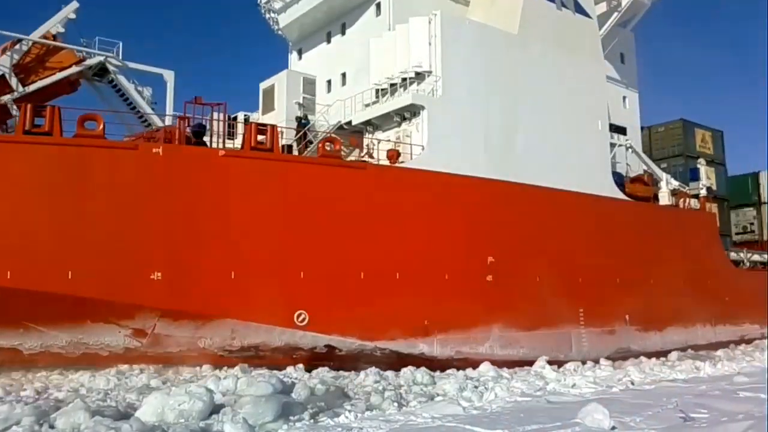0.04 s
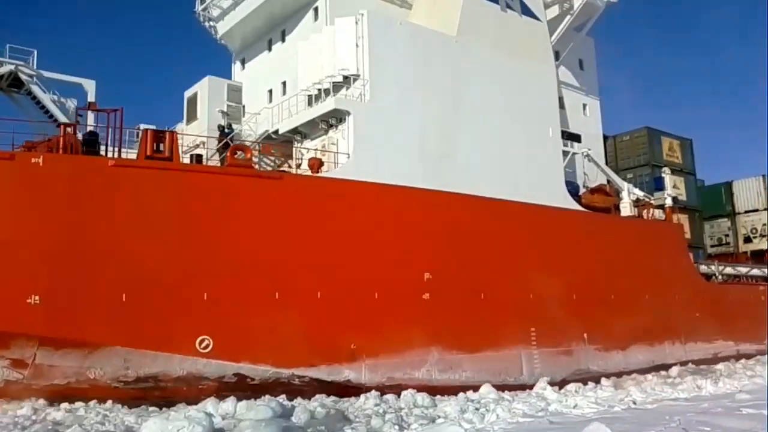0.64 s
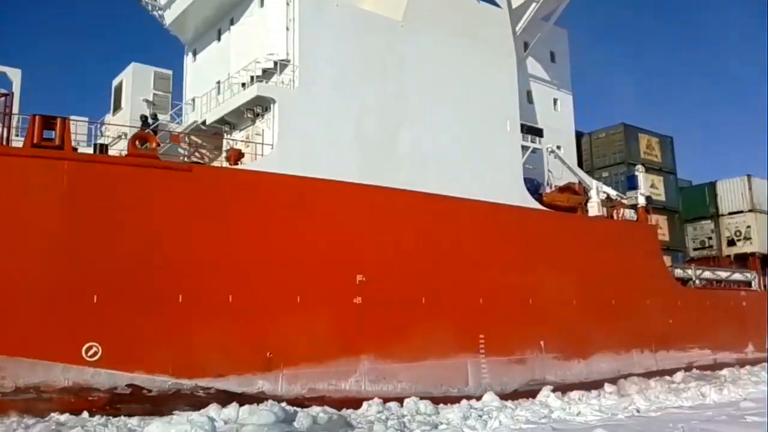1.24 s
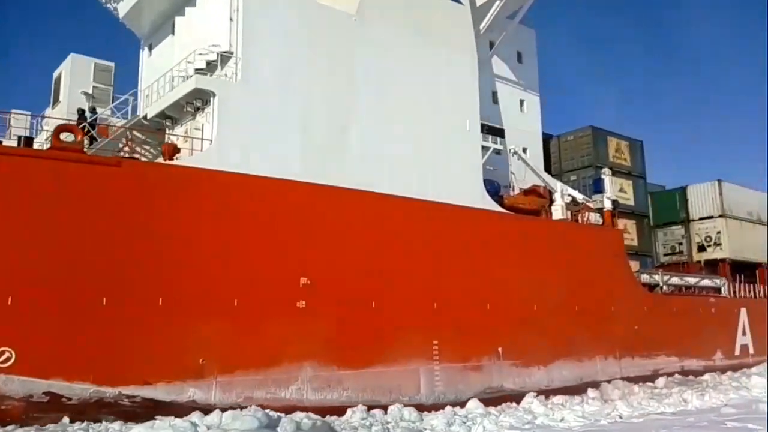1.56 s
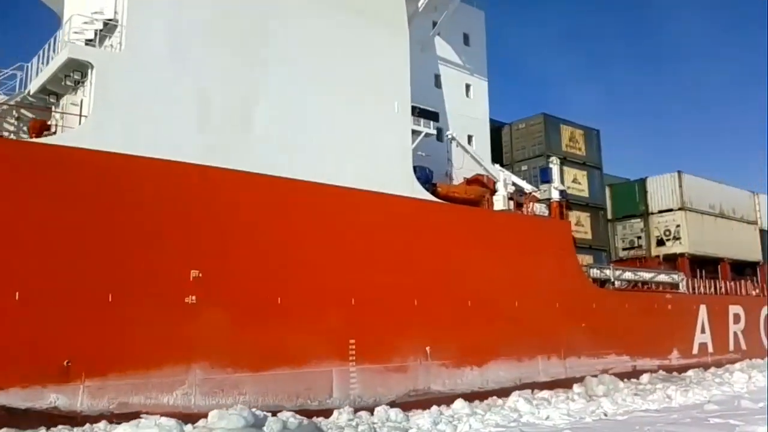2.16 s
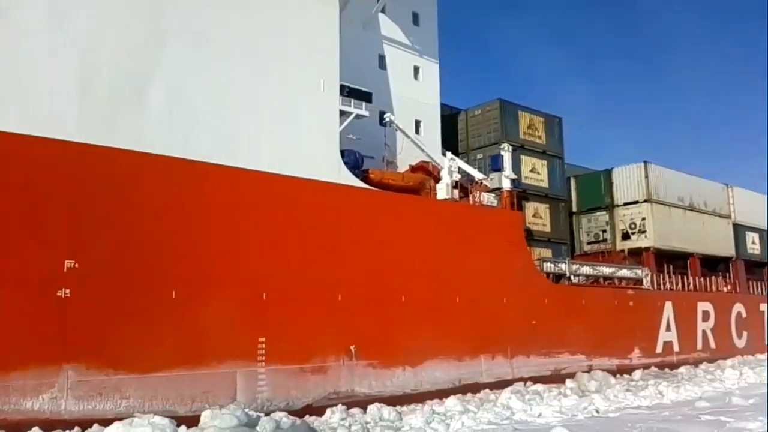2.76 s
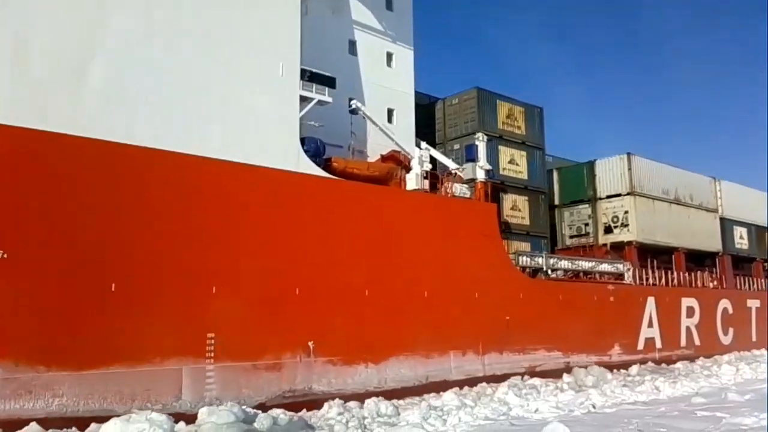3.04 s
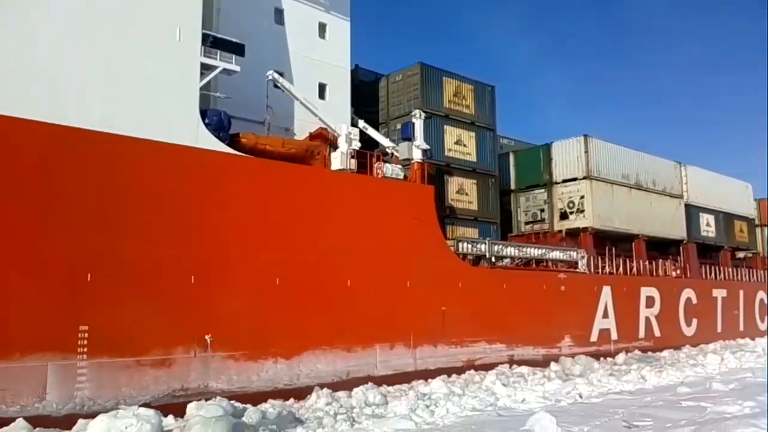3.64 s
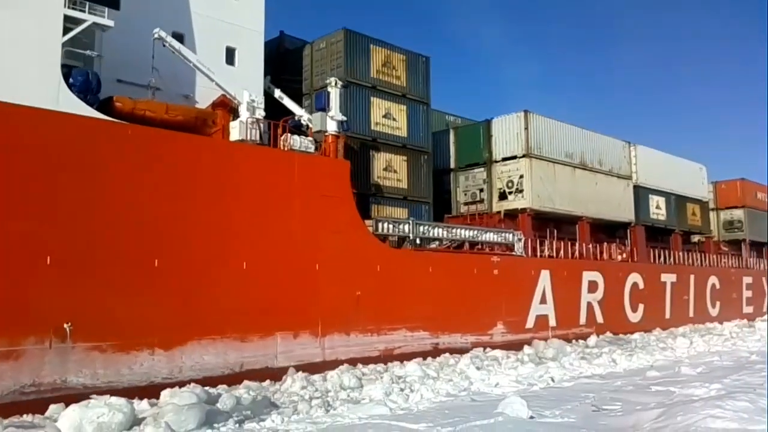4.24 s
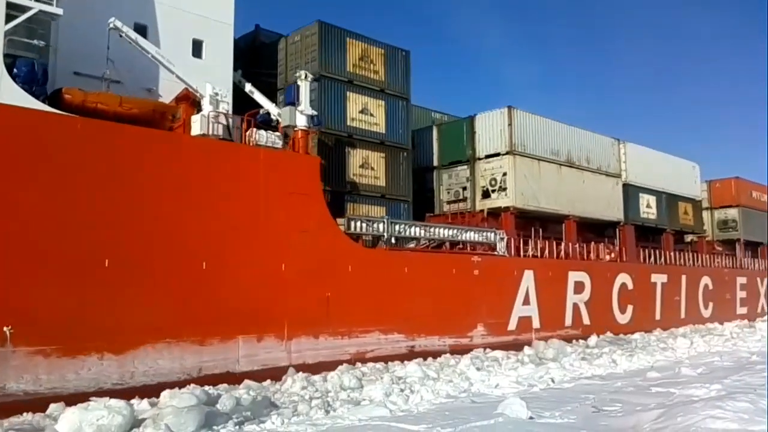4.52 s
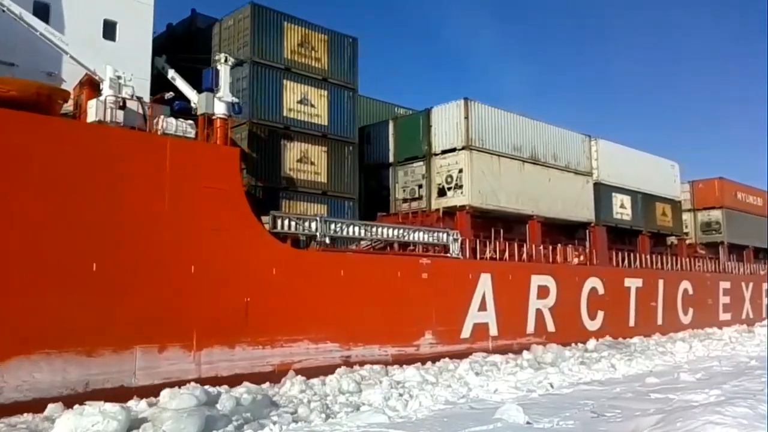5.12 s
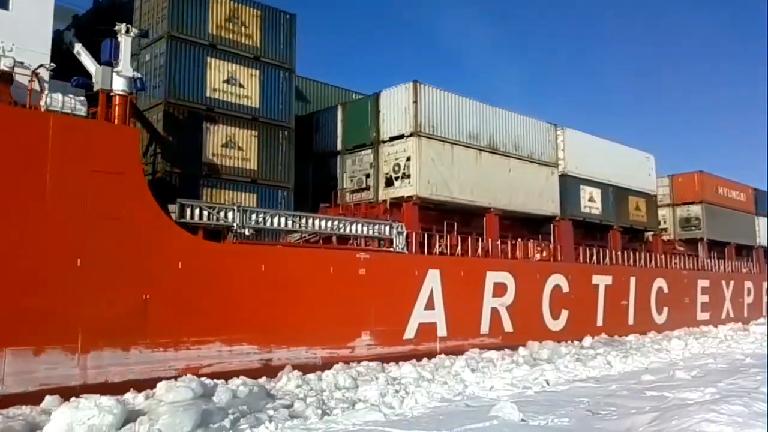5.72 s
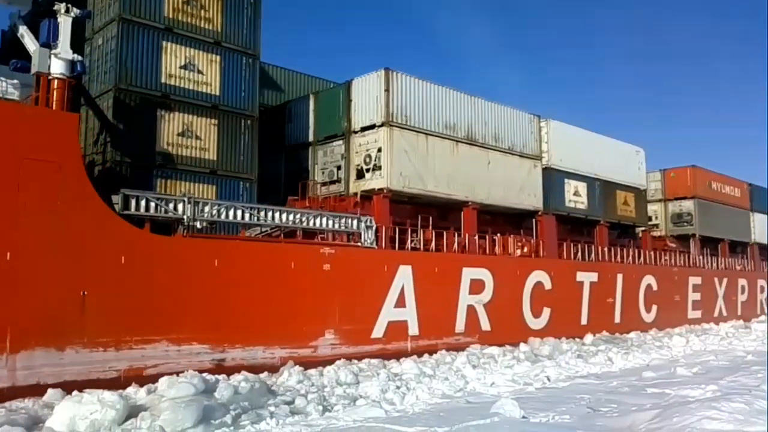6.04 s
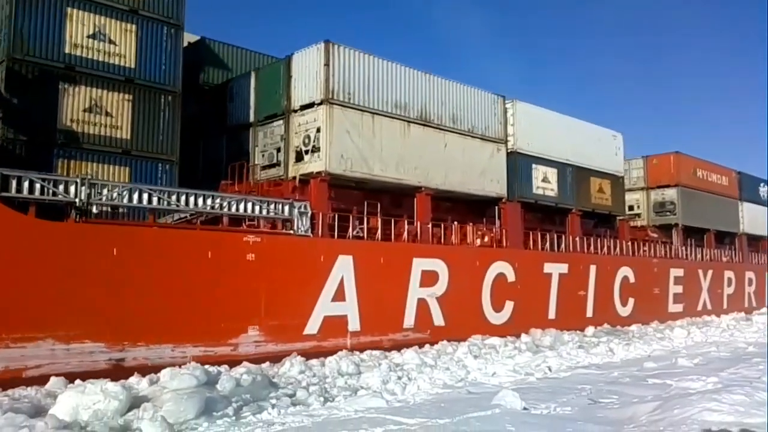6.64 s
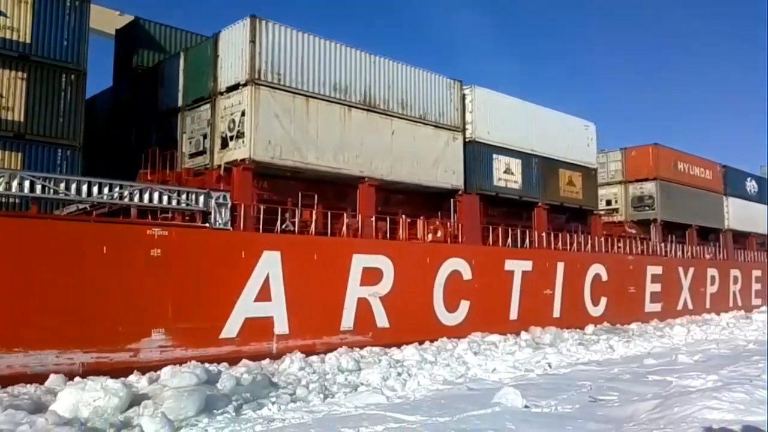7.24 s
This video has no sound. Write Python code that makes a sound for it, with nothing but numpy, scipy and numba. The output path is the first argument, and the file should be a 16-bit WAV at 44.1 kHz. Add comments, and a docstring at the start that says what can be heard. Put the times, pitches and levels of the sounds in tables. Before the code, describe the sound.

A large cargo ship pushes through broken sea ice in the open air, heard from tens of metres away. Its diesel engine hums and throbs with a deep rumble throughout. Floes grind, crunch, snap and knock against the steel hull, with brief squeaks and scrapes, while water churns and slush hisses. The cracks thin out after the first few seconds and the hiss dulls, leaving the engine and a slowly fading grind.

```python
"""A cargo ship's diesel hums and throbs as the hull pushes past through broken sea ice, tens of metres off.
Exhaust tones ride on the rumble of machinery and propeller; air gulps in the churning water.
Floes grind in shoves, knock and scrape on the plating, squeak, snap and plunge back in.
Slush pours, spray fizzes and loose snow slides; all these textures are swarms of tiny ringing grains.
As the wash moves away the hiss sinks and dulls, leaving the engine and the slowly fading grind."""
import sys
import numpy as np
from scipy import signal
from scipy.fft import rfft, irfft, next_fast_len
from scipy.io import wavfile
from scipy.ndimage import uniform_filter1d
from numba import njit

SR = 44100
rng = np.random.default_rng(int(sys.argv[2]) if len(sys.argv) > 2 else 0)


def to_wav(s):
    """Save 16-bit WAV."""
    ch = np.atleast_2d(s).T  # columns
    pcm = np.round(np.clip(ch, -1, 1) * 32767)  # PCM
    wavfile.write(sys.argv[1], SR, pcm.astype(np.int16))


N = 321048
T = np.arange(N) / SR

# EQ of sliding snow and of scraped hull plating: f/Hz, level/dB
SNOW_EQ = [(2500, -11), (5800, -4), (8000, -7), (11500, -9), (15000, -36)]
PLATING_EQ = [(700, -32), (1100, -4), (1420, 10), (1620, 0), (1900, -31), (3000, -41)]
# EQ of the beds that change as the ship passes: f/Hz, level abeam/dB, level once past/dB
SPRAY_EQ = [(4000, 1.5, 4), (6800, -1.5, -6), (9400, -3.5, -5), (11400, -2.5, -5.5), (13800, -0.5, -22),
            (15000, -3, -27.5), (15800, -12, -38)]
SLUSH_EQ = [(1200, -5.5, -3.5), (2280, -7, -5.5), (2520, -9, -8.5), (2980, -2, -3.5), (3660, -2, -1.5),
            (4700, -9.5, -3.5), (5560, -11, -7.5), (7230, -15, -17.5), (10200, -23.5, -20),
            (14900, -44, -60)]
GRIND_EQ = [(202, -1.5, -8), (388, -3.5, -6), (524, -1.5, -0.5), (730, 0, -1.5), (885, -2, -5.5),
            (1017, -1.5, -4), (1255, -8, -9.5), (1500, -8.5, -13.5), (1870, -21, -20.5), (2260, -16, -31),
            (4000, -28, -35)]
CHURN_EQ = [(60, -21, -19.5), (128, 0, 2), (154, -1, -2.5), (196, -1, -4), (270, -6, -7), (334, -15, -10),
            (464, -28, -16.5), (910, -24, -42)]
RUMBLE_EQ = [(12, -38, -40), (24, -11, -12), (39.2, -5.5, 3), (56, -0.5, 2), (86, -2.5, 5.5),
             (117, -10, -6), (198, -44, -25)]
# stereo tilt: f/Hz, left minus right/dB
STEREO_EQ = [(60, -1), (200, -1), (380, -1.5), (700, -1.5), (1290, 0), (2380, -.5), (4400, -2),
             (8120, -0.5), (15000, 0)]
# swells of sliding snow and of ice scraping steel: middle t/s, half length/s, level/dB
SNOW_SLIDES = [(0.345, .025, -35), (6.37, 0.036, -60), (6.63, 0.043, -53), (6.754, 0.035, -50),
               (7.11, 0.047, -54)]
SCRAPES = [(1.48, 0.14, -37), (3.8, .08, -48), (4.15, 0.62, -39), (4.86, 0.076, -36.5), (5.5, 0.23, -39)]
# foam boiling up along the hull: middle t/s, half length/s, rise/dB
FOAM_BOILS = [(1.42, 0.12, 1.5), (2.72, .14, 1), (5.48, 0.15, 1.5)]
# the hull shoving into floes (a negative rise slips free): middle t/s, half length/s, rise/dB
SHOVES = [(.345, 0.04, 4), (0.684, 0.03, 1.5), (0.856, 0.032, 2.5), (.97, 0.026, -1), (1.478, 0.17, 2),
          (2.6, 0.67, 1), (4.062, 0.32, 2), (4.704, 0.11, -3), (5.2, 0.94, 1.5), (7.252, 0.53, 3.5)]
# loudness of the pouring slush: t/s, level/dB
SLUSH_LEVEL = [(0.0, -30), (0.34, -30), (0.38, -32.5), (1.54, -30.5), (1.64, -33.5), (2.86, -34.5),
               (4.76, -44), (7.28, -49.5)]
# floes rubbing: middle t/s, half length/s, level/dB, f/Hz
SQUEAKS = [(0.368, 0.031, -33, 1374), (1.928, 0.012, -31, 1146), (2.028, 0.0096, -26, 1117),
           (3.247, 0.008, -23, 1070), (3.775, 0.019, -31, 1100)]
# pieces snapping, shards falling, slabs breaking, blocks plunging: t/s, peak before trim/dB, f/Hz
SNAPS = [(0.03, -16, 3210), (0.138, -17, 2900), (0.22, -21, 3500), (0.25, -16, 3300), (0.3276, -17, 3640),
         (0.411, -17, 2830), (0.489, -12.5, 2970), (0.78, -16, 3650), (1.0125, -18, 4450),
         (1.11, -17, 3380), (1.275, -20, 3400), (1.3966, -14, 3380), (1.485, -9.5, 850), (1.709, -16, 4300),
         (1.915, -18.5, 3480), (2.391, -18, 3330), (2.969, -19, 4100), (3.041, -19, 3970),
         (3.954, -27, 5460)]
CHINKS = [(0.158, -26, 3400), (0.318, -24, 3270), (0.87, -33, 2250), (1.08, -29, 2910), (2.395, -35, 3360)]
CRUNCHES = [(0.0, -5.5, 744), (0.09, -10, 790), (0.33, -15, 700), (0.51, -8.5, 760), (0.64, -10, 765),
            (0.785, -11, 818), (1.012, -7, 710), (1.04, -13, 690), (1.168, -6.5, 660), (1.216, -10, 810),
            (1.3, -10, 750), (1.484, -13, 740), (1.575, -13, 760), (2.16, -16, 700), (2.56, -14, 1090),
            (2.62, -18, 1080), (2.83, -8, 766), (3.215, -16, 1090), (3.764, -16, 980), (4.099, -12, 500),
            (4.5, -16, 900), (5.645, -16, 680), (6.23, -16, 830), (6.9, -12.5, 630)]
PLUNGES = [(0.0, -19, 420), (0.485, -15, 290), (1.115, -11, 260), (2.24, -12, 260), (2.35, -13.5, 285),
           (2.67, -14, 307)]
# floes hitting the hull: t/s, peak before trim/dB, f/Hz, attack/cycles
KNOCKS = [(0.145, -15, 165, 1), (0.343, -9, 60, 0.7), (0.345, -11, 175, 2.4), (0.363, -9, 111, 0.44),
          (0.395, -13, 151, 0.55), (0.416, -4.5, 138, .7), (0.489, -8, 192, 1.3), (0.874, -8, 90, 0.56),
          (0.926, -7.5, 175, 0.56), (0.978, -15, 150, 0.59), (1.169, -7.5, 151, .64),
          (1.258, -12.5, 144, 1), (1.39, -14, 166, 1.1), (1.572, -5, 86, 0.55), (1.584, -7, 139, 0.89),
          (2.021, -11, 111, 1.1), (2.19, -9.5, 126, 1.2), (3.631, -14, 142, 1.3)]
# exhaust tones: multiple of the four-stroke cycle rate, then level/dB at each of ENGINE_PASS_S
EXHAUST_TONES = [(6, -35, -32, -34, -32), (11, -32, -30.5, -23, -38), (12, -53, -41, -41, -40),
                 (13, -44, -38, -38, -34), (14, -25.5, -33, -30.5, -22.5), (15, -30.5, -39, -32, -24.5),
                 (16, -41, -25, -26, -27.5), (17, -31.5, -25, -31.5, -30), (24, -52, -46, -55, -37.5)]
ENGINE_PASS_S = (1, 2.6, 3.8, 5.4)  # approaching, near, abeam, past


def undb(db):
    """Decibels to gain."""
    return 10 ** (np.asarray(db) / 20)


def unit(x):
    """Scale to rms 1."""
    return x / np.sqrt(np.mean(x ** 2))


def walk(rate_hz):
    """Smooth random modulation with a spread near 1."""
    hold = int(SR / rate_hz)
    steps = rng.standard_normal(1024)[np.arange(N) // hold % 1024]
    return 1.1 * uniform_filter1d(uniform_filter1d(steps, hold), hold)


def fade(db, held_s, db_per_s):
    """A level in dB that holds, then sinks steadily."""
    return db - db_per_s * np.maximum(T - held_s, 0)


def bell(middle_s, half_s):
    """A smooth rise and fall, peaking at 1."""
    return np.exp(-((T - middle_s) / half_s) ** 2)


def swells(rows):
    """A gain envelope that swells out of silence."""
    return sum(undb(db) * bell(s, half_s) for s, half_s, db in rows)


def rises(rows):
    """Smooth bumps and dips of level, in dB."""
    return sum(db * bell(s, half_s) for s, half_s, db in rows)


def colour(x, hz, db):
    """An EQ curve drawn on a log-frequency axis."""
    size = next_fast_len(N + 8192)
    f = np.maximum(np.arange(size // 2 + 1) * SR / size, 1)
    gain = undb(np.interp(np.log(f), np.log(hz), db))
    return irfft(rfft(x, size) * gain, size)[..., :N]


def passing(x, eq, abeam_s, past_s):
    """Crossfade a source from its abeam colour to its past colour, each at rms 1."""
    past = np.clip((T - abeam_s) / (past_s - abeam_s), 0, 1)
    roll_off = (2 * eq[-1][0], -90, -90)
    hz, abeam_db, past_db = np.transpose([*eq, roll_off])
    return (1 - past) * unit(colour(x, hz, abeam_db)) + past * unit(colour(x, hz, past_db))


@njit
def ring(start_s, hz, cycles, size, pan, glide):
    """Each grain is a panned sine that dies over its cycles while its pitch glides up."""
    out = np.zeros((2, N))
    for k in range(len(start_s)):
        length = int(cycles[k] * SR / hz[k]) + 2
        step = 2j * np.pi * hz[k] / SR
        phasor = size[k] + 0j
        turn = np.exp(step - 6 / length)
        bend = np.exp(step * glide / length)
        first = int(start_s[k] * SR)
        for i in range(first, min(first + length, N)):
            phasor *= turn
            turn *= bend
            out[0, i] += phasor.imag * (1 + pan[k])
            out[1, i] += phasor.imag * (1 - pan[k])
    return out


def grains(count, lo_hz, hi_hz, cycles, spread_db, width, glide):
    """A swarm of fractures or bubbles of random size, with an even spectrum."""
    when, pitch, life, chance, side, sign = rng.random((count, 6)).T
    hz = lo_hz * (hi_hz / lo_hz) ** pitch
    size_db = spread_db * np.minimum(-np.log(1 - chance), 2 * np.pi)
    size = hz * np.sign(sign - .5) * undb(size_db)
    pan = width * (2 * side - 1)
    return unit(ring(when * N / SR, hz, cycles * (.5 + life), size, pan, glide))


def snow():
    """Loose snow slides off the floes in short swishes."""
    crystals = grains(count=60000, lo_hz=2500, hi_hz=15000, cycles=7.1, spread_db=3, width=.5, glide=0.)
    return swells(SNOW_SLIDES) * unit(colour(crystals, *np.transpose(SNOW_EQ)))


def scrapes():
    """Hard ice drags along the steel in dense little slips."""
    slips = grains(count=14000, lo_hz=757, hi_hz=3020, cycles=21, spread_db=-1, width=0.06, glide=0.)
    return swells(SCRAPES) * unit(colour(slips, *np.transpose(PLATING_EQ)))


def squeaks(jitter=0.0707, grit_db=5.5):
    """Ice sticks and slips on ice: brief, rough creaks of unsteady pitch."""
    out = np.zeros(N)
    slip = 1 + jitter * walk(600)
    for s, half_s, db, hz in SQUEAKS:
        phase = 2 * np.pi * np.cumsum(hz * slip) / SR
        out += undb(db) * bell(s, half_s) * np.sin(phase)
    return np.sqrt(2) * out * undb(grit_db * walk(700))


def spray(shove_db, flutter_db=1.34):
    """Fine droplets and bursting foam fizz wide along the hull, and fall away quickly near the end."""
    foam = grains(count=190000, lo_hz=4070, hi_hz=16450, cycles=25, spread_db=0, width=0.61, glide=0.036)
    ending_db = fade(0, held_s=6, db_per_s=8)
    db = fade(-38.5, held_s=3.12, db_per_s=4.75) + ending_db
    db += rises(FOAM_BOILS) + 0.15 * shove_db + flutter_db * walk(25.37)
    return passing(foam, SPRAY_EQ, abeam_s=3.7, past_s=6.2) * undb(db)


def slush(shove_db, surge_db=1.07, trim_db=1.02):
    """Water and crumbs of ice pour back over the floes."""
    splash = grains(count=140000, lo_hz=1181, hi_hz=14730, cycles=25.5,
                    spread_db=-0.5, width=0.3, glide=0.043)
    db = np.interp(T, *np.transpose(SLUSH_LEVEL)) + trim_db + 0.17 * shove_db + surge_db * walk(30)
    return passing(splash, SLUSH_EQ, abeam_s=0.7, past_s=5.8) * undb(db)


def ice_hits(rows, bandwidth, decay_s, trim_db):
    """Each hit is a dying burst of noise ringing one resonance of ice or water."""
    out, t = np.zeros(2 * N), T[:SR // 4]
    for s, db, hz in rows:
        burst = rng.standard_normal(len(t)) * np.exp(-t / decay_s)
        band_hz = [hz / (1 + bandwidth), hz * (1 + bandwidth)]
        hit = signal.sosfilt(signal.butter(2, band_hz, "band", fs=SR, output="sos"), burst)
        first = int(s * SR)
        out[first:first + len(t)] += hit * undb(db + trim_db) / np.max(np.abs(hit))
    return out[:N]


def knocks(trim_db=-0.5):
    """A heavy floe meets the plating: a low thud builds quickly and the water damps it."""
    out, t = np.zeros(2 * N), T[:SR // 4]
    for s, db, hz, attack_cycles in KNOCKS:
        age = t * hz / attack_cycles
        thud = age * np.exp(1 - age) * np.sin(2 * np.pi * hz * t)
        first = int(s * SR)
        out[first:first + len(t)] += undb(db + trim_db) * thud
    return out[:N]


def grind(shove_db, judder_db=0.94):
    """Floes crush and tumble against each other in uneven shoves."""
    crush = grains(count=45000, lo_hz=200.2, hi_hz=3548, cycles=18.2,
                   spread_db=0.47, width=0.057, glide=0.023)
    db = fade(-24.5, held_s=0.52, db_per_s=0.95) + shove_db + judder_db * walk(22.03)
    return passing(crush, GRIND_EQ, abeam_s=0.98, past_s=5.0) * undb(db)


def churn(shove_db, heave_db=0.7):
    """Large pockets of air gulp in the water beside the hull."""
    gulps = grains(count=13000, lo_hz=58.9, hi_hz=796, cycles=6.8,
                   spread_db=1.05, width=0.069, glide=0.22)
    db = fade(-21.2, held_s=2.66, db_per_s=1.02) + 0.71 * shove_db + heave_db * walk(13)
    return passing(gulps, CHURN_EQ, abeam_s=0.38, past_s=2.7) * undb(db)


def rumble(engine_phase, throb=0.12, side_db=-32):
    """Machinery and propeller shake the hull; the roar swells once an engine cycle."""
    mid, side = rng.standard_normal((2, N))
    shake = mid + undb(side_db) * np.array([side, -side])
    roar = passing(shake, RUMBLE_EQ, abeam_s=2.3, past_s=6.3)
    db = fade(-20.5, held_s=6.6, db_per_s=0.13)
    return roar * undb(db) * (1 + throb * np.cos(engine_phase))


def diesel(cycle_hz=6.35, doppler_hz_per_s=0.022, first_beat_s=0.062, waver_db=2.1, smear_rad=2.16):
    """Exhaust hum and engine phase: harmonics of the firing cycle, sagging in pitch as the ship passes."""
    rate_hz = cycle_hz - doppler_hz_per_s * T
    phase = 2 * np.pi * (np.cumsum(rate_hz) / SR - cycle_hz * first_beat_s)
    hum = np.zeros(N)
    for multiple, *levels_db in EXHAUST_TONES:
        tone_db = np.interp(T, ENGINE_PASS_S, levels_db) + waver_db * walk(1.2)
        lag = smear_rad * multiple ** 2  # the long uptake delays higher tones, smearing the firings
        hum += undb(tone_db) * np.sin(multiple * phase - lag)
    return np.sqrt(2) * hum * undb(fade(0.17, held_s=5.75, db_per_s=3)), phase


def scene():
    """Engine, wake and breaking ice in open air; the same shoves push all four layers of the wake."""
    shove_db = rises(SHOVES)
    exhaust, engine_phase = diesel()
    snaps = ice_hits(SNAPS, bandwidth=0.32, decay_s=0.018, trim_db=-5.0)
    chinks = ice_hits(CHINKS, bandwidth=0.0086, decay_s=0.023, trim_db=-0.5)
    crunches = ice_hits(CRUNCHES, bandwidth=0.33, decay_s=0.041, trim_db=-7.5)
    plunges = ice_hits(PLUNGES, bandwidth=0.26, decay_s=0.068, trim_db=-3.5)
    wake = churn(shove_db) + grind(shove_db) + slush(shove_db) + spray(shove_db)
    ice = snaps + chinks + crunches + plunges + knocks() + squeaks() + scrapes() + snow()
    return exhaust + rumble(engine_phase) + wake + ice


def record(dry):
    """Ease both ends, tint left and right slightly apart and cut the very top."""
    edge_s, top_hz = 0.004, 15500
    ramp = np.minimum(np.minimum(T, T[::-1]) / edge_s, 1)
    left, right = dry * np.sin(np.pi / 2 * ramp) ** 2
    hz, tilt_db = np.transpose(STEREO_EQ)
    tinted = np.array([colour(left, hz, tilt_db / 2), colour(right, hz, -tilt_db / 2)])
    return signal.sosfilt(signal.ellip(10, .2, 80, top_hz, fs=SR, output="sos"), tinted)


dry = scene()
out = record(dry)
to_wav(out)
```